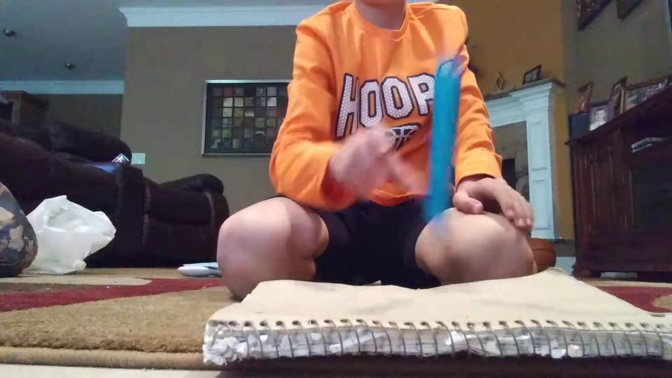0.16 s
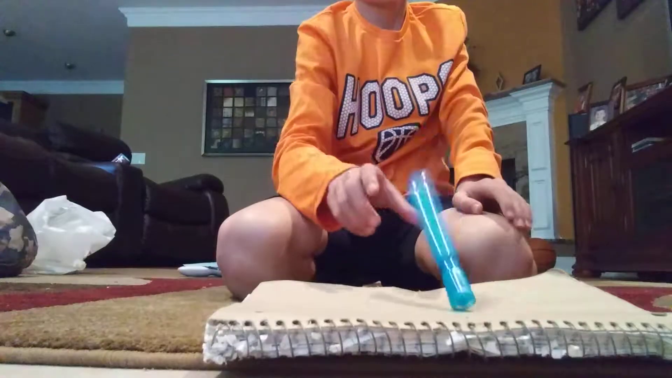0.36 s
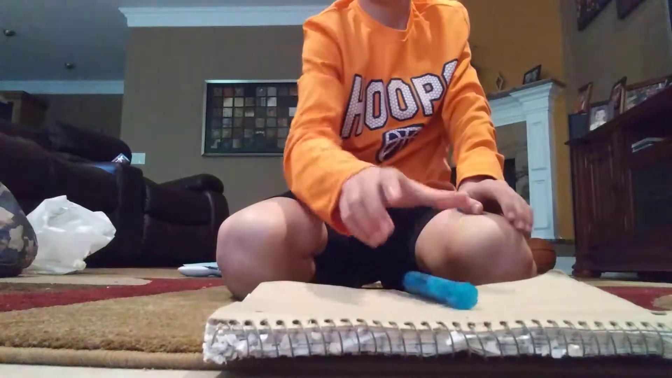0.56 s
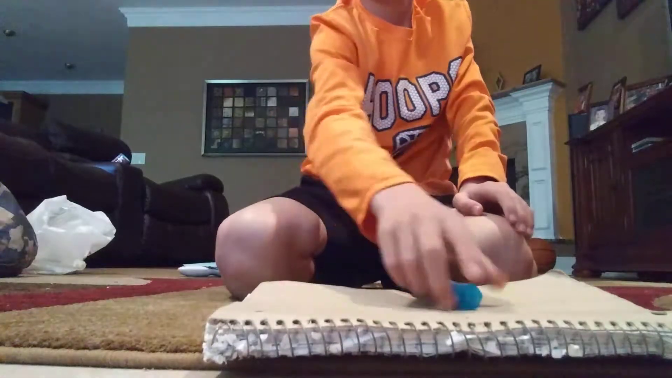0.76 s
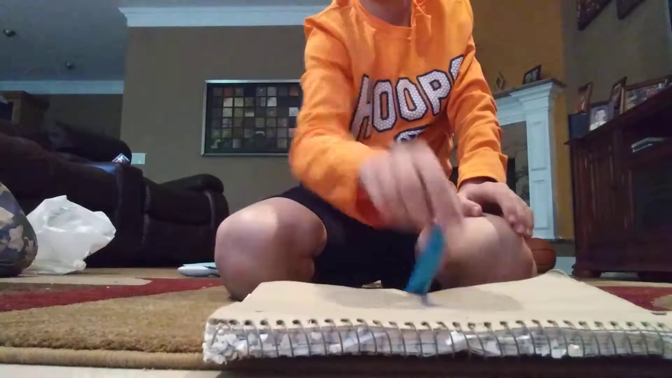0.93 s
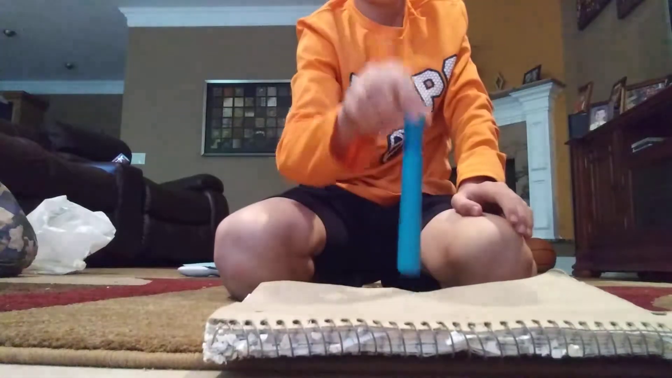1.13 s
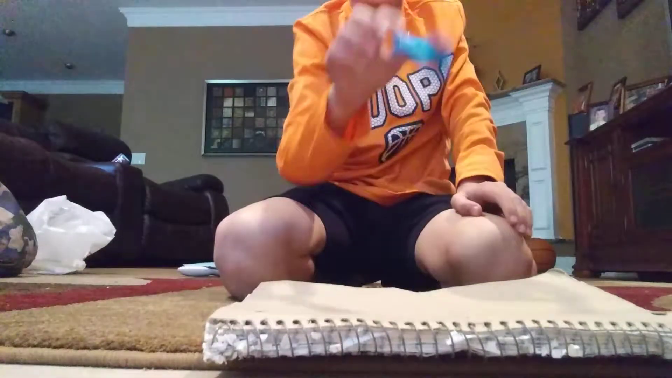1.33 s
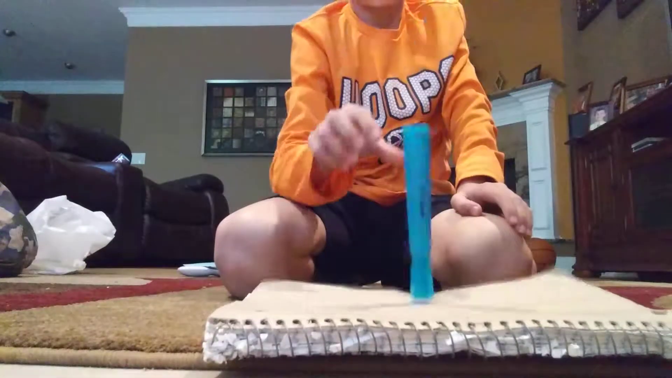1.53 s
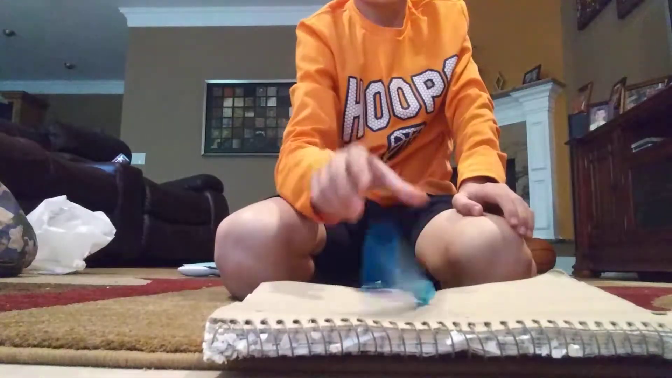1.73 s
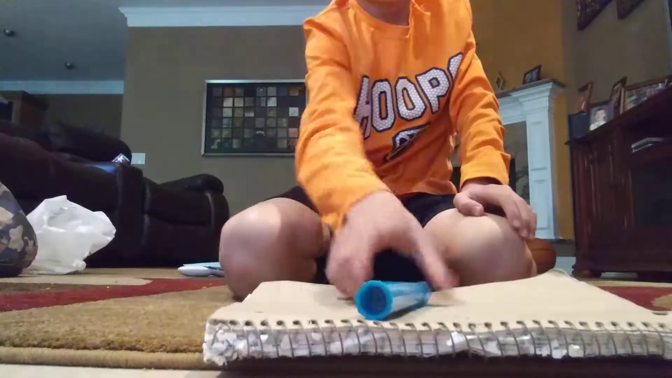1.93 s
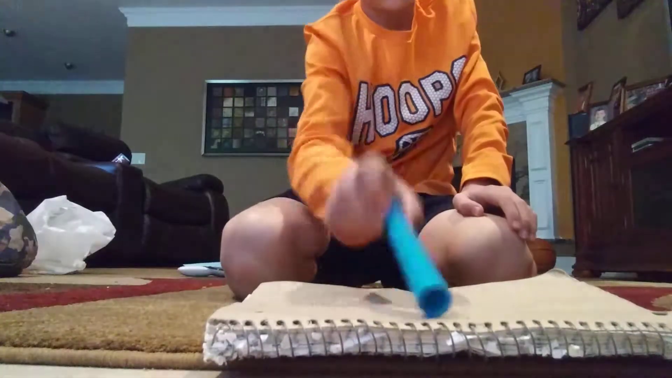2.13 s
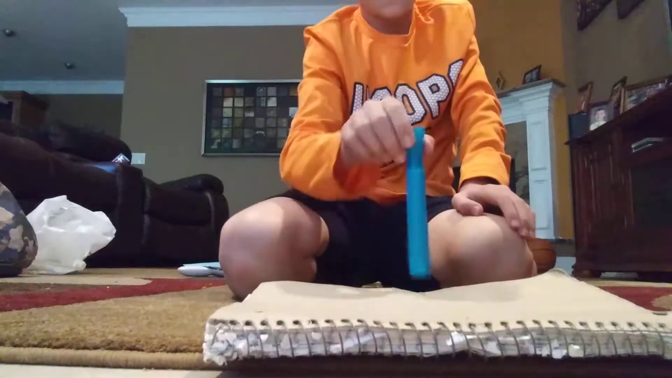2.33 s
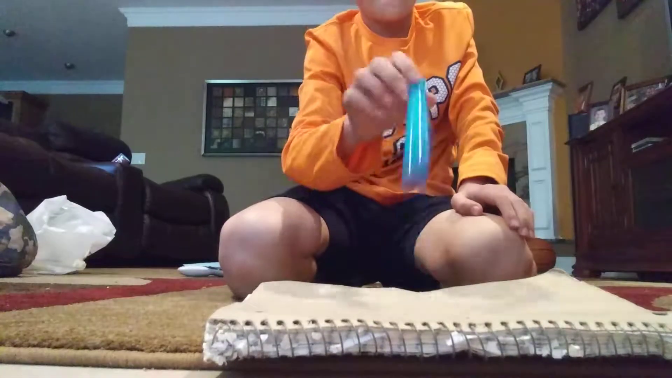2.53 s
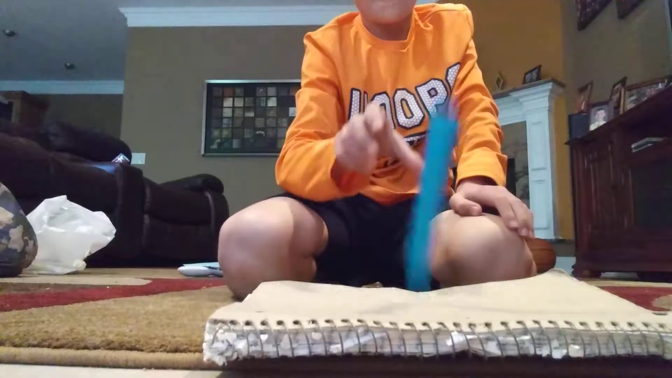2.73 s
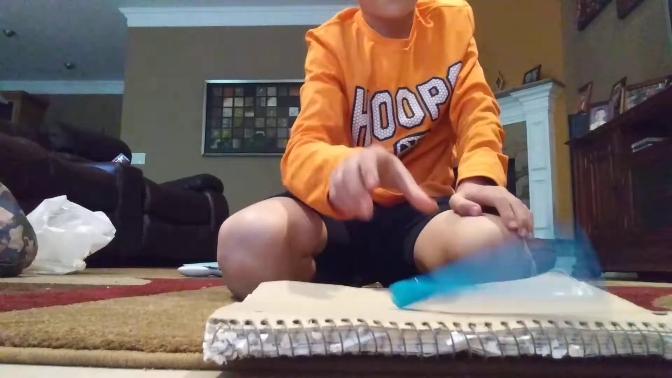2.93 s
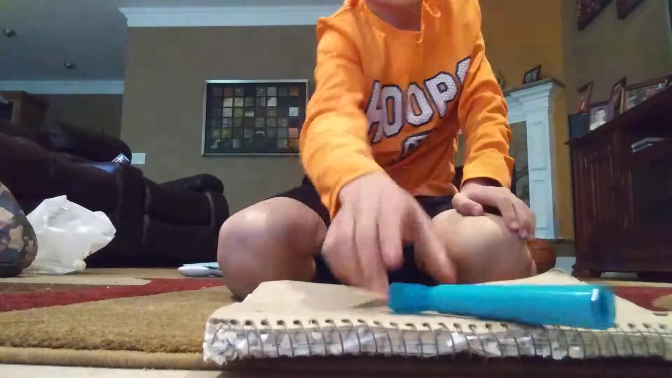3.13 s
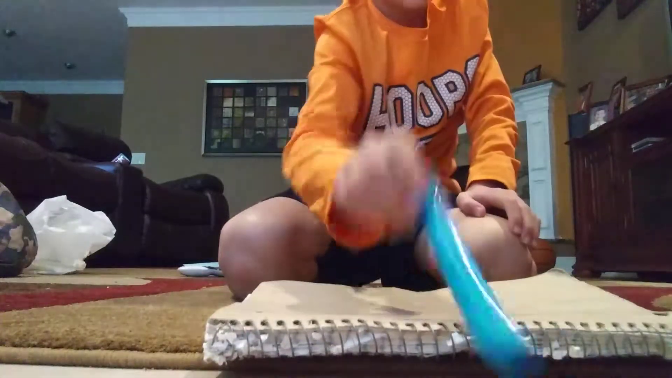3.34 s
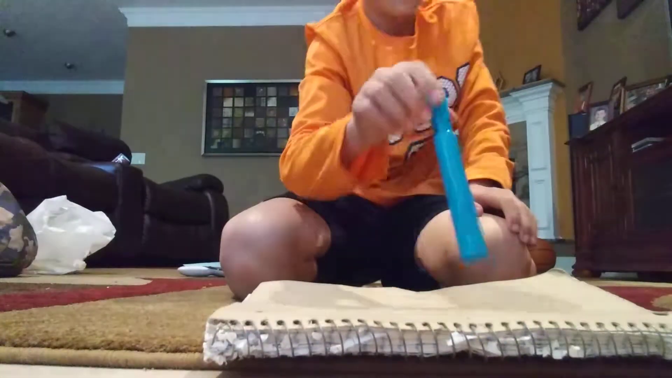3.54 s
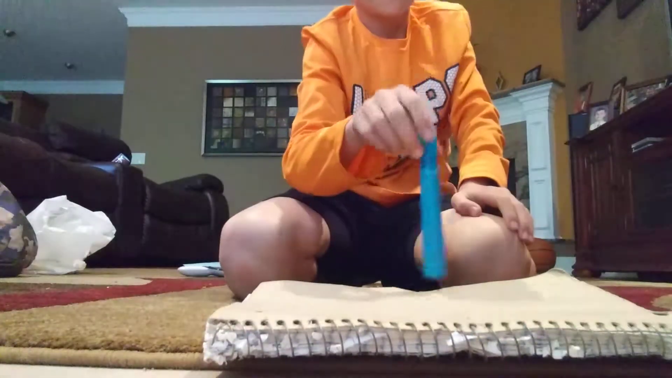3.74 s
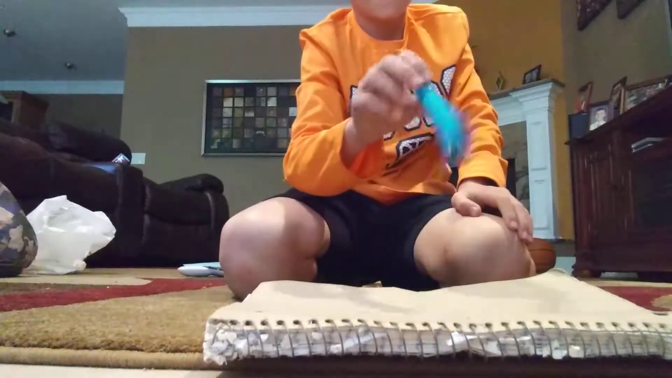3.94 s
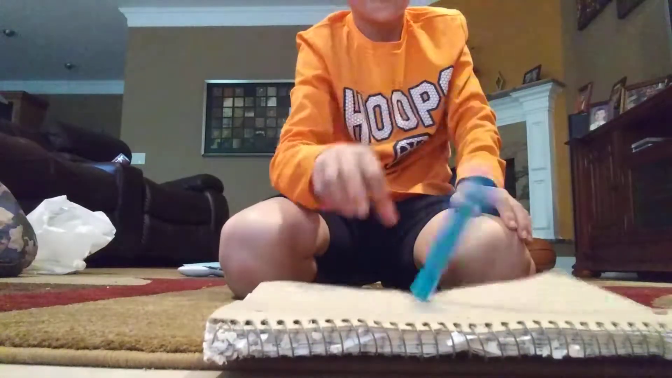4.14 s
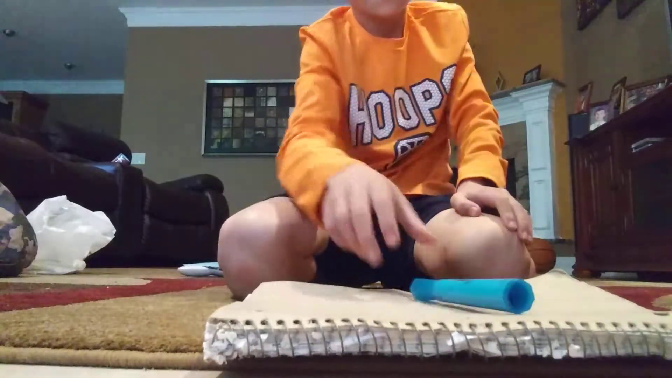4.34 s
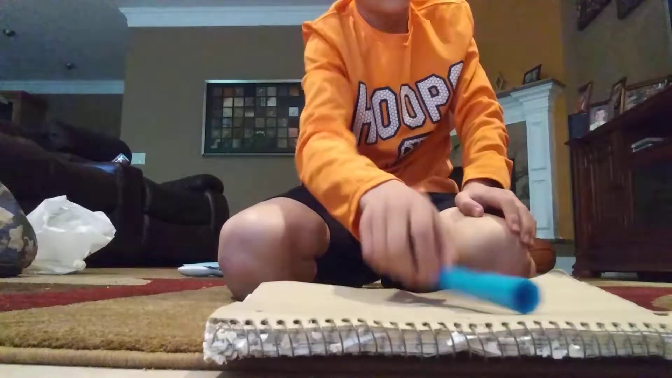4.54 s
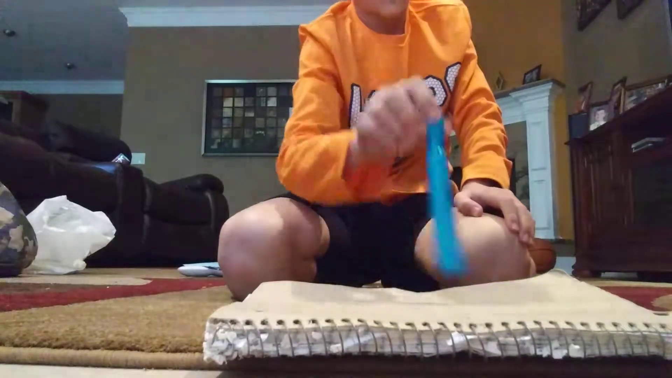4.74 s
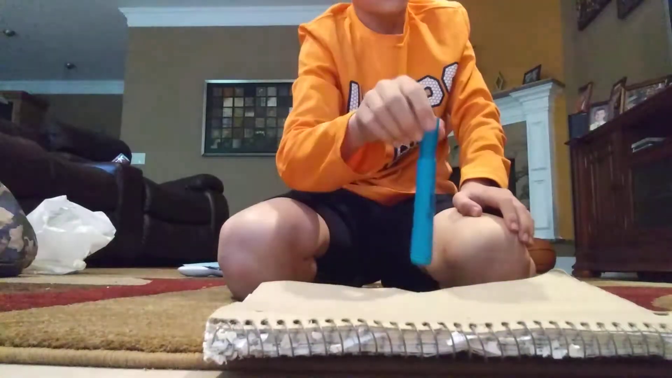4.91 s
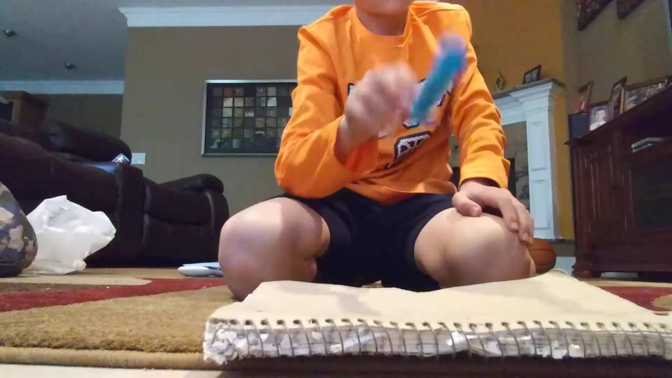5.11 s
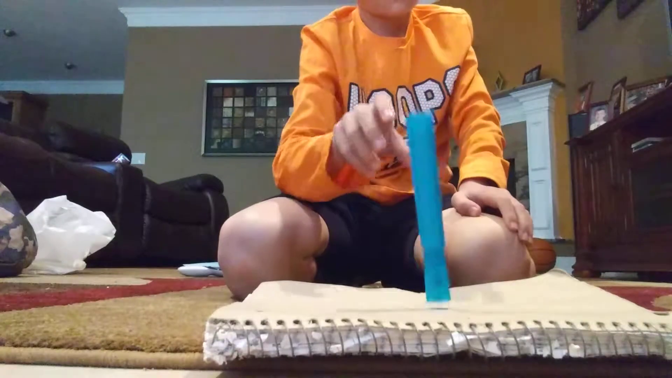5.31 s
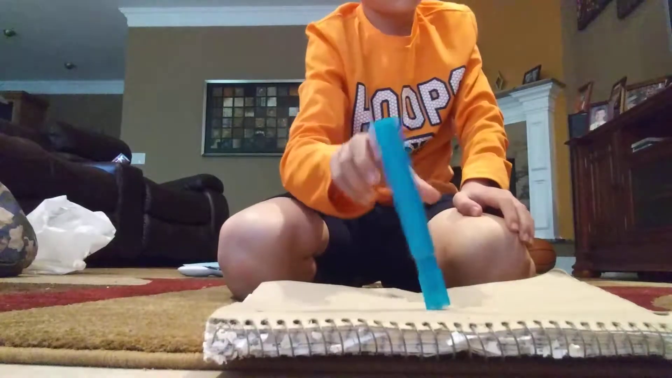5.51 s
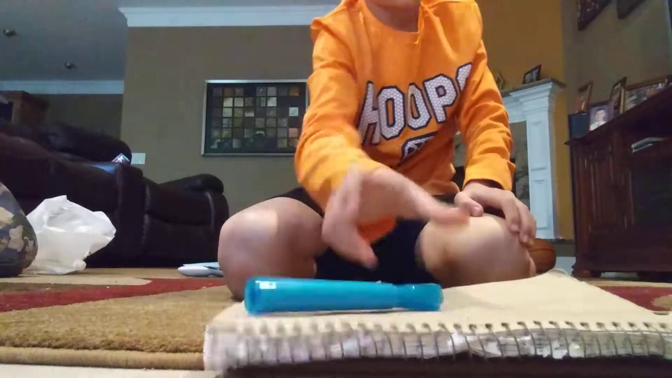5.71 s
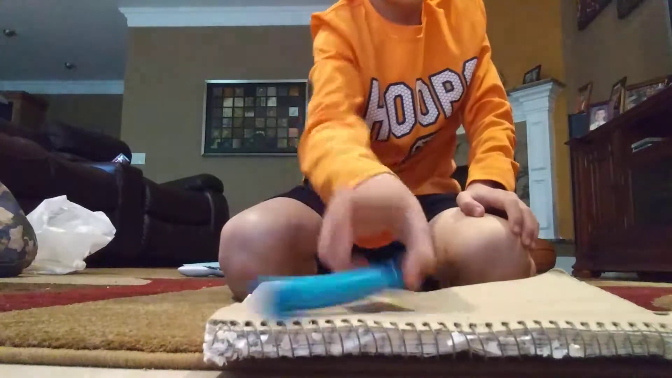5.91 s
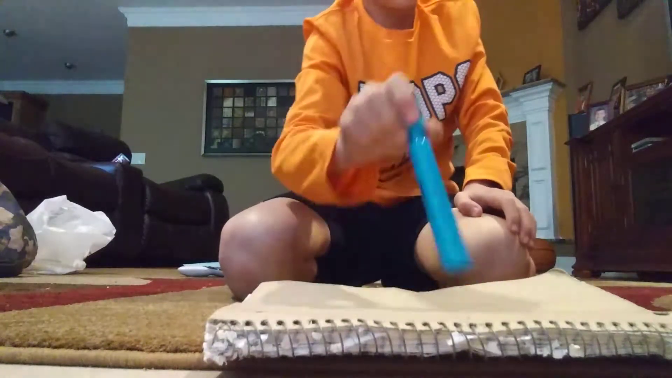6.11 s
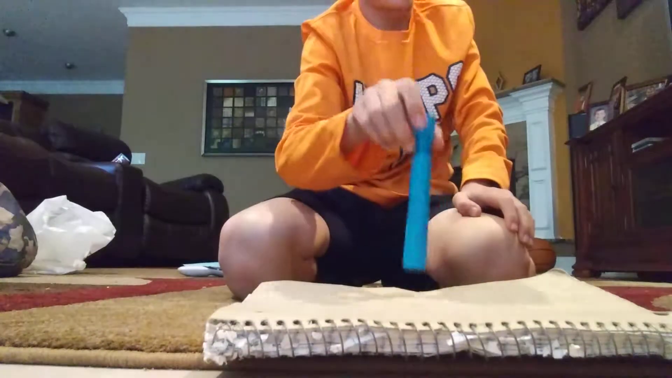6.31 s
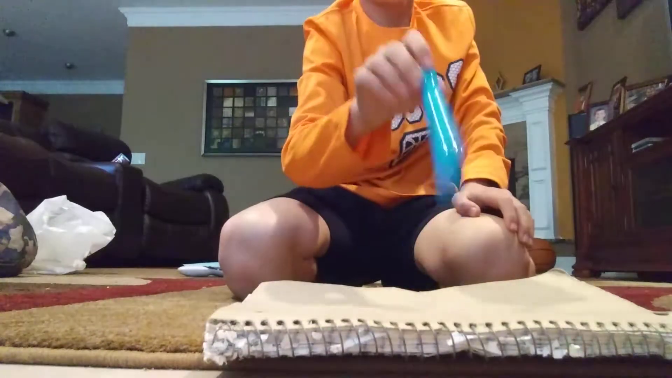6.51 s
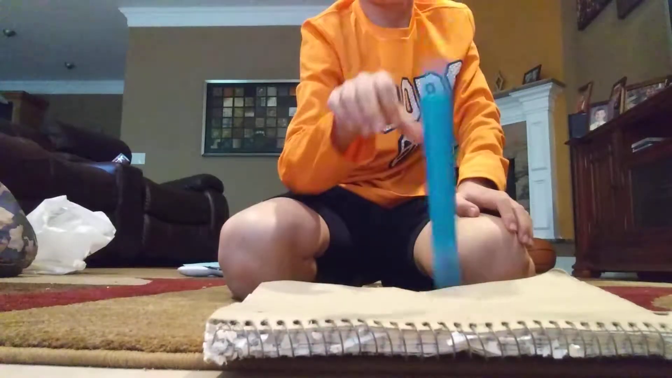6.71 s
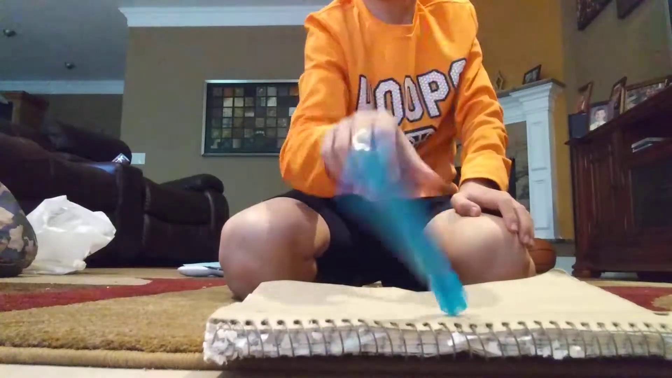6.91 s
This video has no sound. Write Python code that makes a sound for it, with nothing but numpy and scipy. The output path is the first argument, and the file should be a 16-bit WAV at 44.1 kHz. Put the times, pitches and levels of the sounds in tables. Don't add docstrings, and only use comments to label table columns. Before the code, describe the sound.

A hollow plastic marker repeatedly clacks end-first onto a paper pad, topples with a slap, bounces and gets scuffed up, ending in a close rattle.

```python
import sys
import numpy as np
from scipy import signal
from scipy.fft import rfft, irfft, next_fast_len
from scipy.io import wavfile
from scipy.ndimage import uniform_filter1d

SR = 44100
rng = np.random.default_rng(int(sys.argv[2]) if len(sys.argv) > 2 else 0)


def bounce(signal):
    frames = np.transpose(np.atleast_2d(signal))
    limited = np.clip(frames, -1, 1)
    pcm = np.round(limited * 32767).astype(np.int16)
    wavfile.write(sys.argv[1], SR, pcm)


def makeup_ratio(level_db):
    decades = np.asarray(level_db, float) / 20
    return 10 ** decades


N = 311346


def unit(x):
    return x / np.sqrt(np.mean(x ** 2) + 1e-20)


def peak_one(x):
    return x / np.abs(x).max()


def along(points, hz):
    f, v = np.transpose(points)
    return np.interp(np.log(hz + 1), np.log(f + 1), v)


def filtered(x, response):
    m = next_fast_len(x.shape[-1] + 8192)
    spectrum = rfft(x, m) * response(np.fft.rfftfreq(m, 1 / SR))
    return irfft(spectrum, m)[..., :x.shape[-1]]


def banded(x, low_hz, high_hz):
    sos = signal.butter(3, [low_hz, high_hz], "band", fs=SR, output="sos")
    return signal.sosfilt(sos, x)


def ringing(x, modes, detune=1):
    def response(f):
        total = 0
        for k, (centre, width, db) in enumerate(modes):
            centre = centre * detune
            damping = 1j * f * width
            total = total + (-1) ** k * makeup_ratio(db) * damping / (centre ** 2 - f ** 2 + damping)
        return total
    return filtered(x, response)


def add(track, s, x):
    track[round(s * SR):][:len(x)] += x


# f/Hz, level/dB
AIR = [(150, -79), (300, -72.5), (600, -73.5), (1200, -78), (3000, -92.5), (5000, -85.5), (8000, -100)]


def air():
    return filtered(rng.standard_normal(N), lambda f: makeup_ratio(along(AIR, f) + 23))


# f/Hz, level/dB per Hz
DRONE = [(20, -48), (50, -11), (75, -11.5), (105, 0.5), (135, -11), (200, -23.5), (400, -37.5), (1000, -65)]
# t/s, level/dB
RUMBLE = [(0.0, -72), (0.5, -66), (0.9, -68), (1.15, -77.5), (1.25, -88), (1.34, -63.5), (1.9, -62.5),
          (2.4, -70.5), (3.0, -68), (3.55, -71), (3.63, -74.5), (3.85, -67.5), (4.75, -73.5), (5.02, -65),
          (5.22, -71), (5.6, -68), (6.4, -67.5), (6.72, -73.5)]
# t/s, level/dB
LINE_PEEKS = [
    (1.49, -82),
    (2.25, -73.5),
    (2.52, -73.5),
    (3.87, -76.5),
    (4.5, -66.5),
    (4.661, -63),
    (4.87, -69),
    (6.17, -75),
    (6.35, -67.5),
    (6.5, -79.5),
]


def drone(pen):
    t = np.arange(N) / SR
    memory_s, open_from_db = 0.071, -60.5
    keep = np.exp(-1 / (memory_s * SR))
    recent = signal.lfilter([1 - keep], [1, -keep], pen ** 2)
    open_db = np.maximum(10 * np.log10(recent + 1e-12) - open_from_db, 0)

    rumble = unit(filtered(rng.standard_normal(N), lambda f: makeup_ratio(along(DRONE, f))))
    rumble_db = np.interp(t, *np.transpose(RUMBLE)) + 3.5 + 0.38 * open_db

    line_mode = [(319.5, 17, 0)]
    line = unit(ringing(ringing(rng.standard_normal(N), line_mode), line_mode))
    peek_s = 0.03
    peeks = sum(makeup_ratio(db) * np.exp(-((t - s) / peek_s) ** 2) for s, db in LINE_PEEKS)
    line_gain = makeup_ratio(-90 + 0.8 * open_db) + peeks
    return makeup_ratio(rumble_db) * rumble + line_gain * line


# f/Hz, t60/s
ROOM = [(60, 1), (200, 0.28), (500, .5), (1500, 0.8), (4000, 1), (8000, 0.6), (14000, 0.9)]
# f/Hz, level/dB
ROOM_DB = [(60, -8), (250, -3), (700, -11.5), (2000, -8.5), (3300, -16), (5500, -12), (10000, -3.5),
           (15000, -16)]
# t/s, level/dB
ECHOES = [(0.0177, -16.5), (0.0343, -23)]


def room(x, uneven_db, wet_db):
    hz, t, z = signal.stft(rng.standard_normal(SR // 2), SR, nperseg=256)
    colour = makeup_ratio(along(ROOM_DB, hz) + wet_db + uneven_db * rng.standard_normal(len(hz)))
    decay = makeup_ratio(-60 * t / along(ROOM, hz)[:, None])
    tail = signal.istft(z * decay, SR, nperseg=256)[1]
    tail = filtered(tail / np.linalg.norm(tail), lambda f: np.interp(f, hz, colour))
    age = np.arange(len(tail)) / SR
    tail *= 1 - np.exp(-age / 0.005)
    tail += makeup_ratio(-30.5 - 60 * age / 0.058) * (age > 0.001) * rng.standard_normal(len(tail))
    for s, db in ECHOES:
        tail[round(s * SR):][:8] += makeup_ratio(db - 17) * rng.standard_normal(8)
        tail[round(s * SR)] += makeup_ratio(db - 3.5)
    for delay, size in rng.random((3, 2)):
        tail[round((0.0004 + 0.002 * delay) * SR)] += makeup_ratio(-13) * (4 * size - 2)
    tail[0] += 1
    return signal.fftconvolve(x, tail)


def rub(length, layers):
    u = np.arange(SR // 8) / SR / np.clip(length, 0.002, 0.12)
    stroke = np.clip(6 * u, 0, 1) * np.clip(1 - u, 0, 1) ** 0.66
    snags = makeup_ratio(0.62 * rng.exponential(size=len(u)))
    total = 0
    for modes, low, high, db in layers:
        grit = rng.standard_normal(len(u)) * snags
        total = total + makeup_ratio(db) * unit(banded(ringing(grit, modes), low, high))
    return stroke * total


# t/s, level/dB, length/s, f/Hz, width/Hz
SQUEAKS = [(3.501, -55, 0.018, 1380, 138.9), (4.102, -65.5, .015, 5680, 80),
           (4.119, -62.5, 0.059, 1893, 90.6), (4.121, -66, .055, 2450, 90), (4.126, -71, 0.065, 5700, 54),
           (4.134, -70.5, .04, 3920, 70), (4.13, -71, .05, 4430, 90), (5.637, -53, 0.057, 1350, 260),
           (5.645, -54, .075, 2150, 260), (5.642, -65.5, 0.024, 6050, 80), (5.668, -71, .04, 5840, 80)]


def squeaks():
    out = np.zeros(N + SR)
    for s, db, length, note_hz, width in SQUEAKS:
        x = rub(length, [([(note_hz, width, 0)], note_hz - width, note_hz + width, db)])
        add(out, s, room(x, uneven_db=0.5, wet_db=-1.5))
    return out[:N]


# t/s, high level/dB, low level/dB, middle level/dB, length/s
DRAGS = [(0.435, -53.5, -55, -55, 0.04), (0.783, -64.5, -58, -63, 0.0094), (0.808, -58, -53, -57.5, 0.038),
         (0.852, -71.5, -58, -62, 0.068), (1.082, -61, -80.5, -79, 0.013), (2.036, -61, -50.5, -64, 0.03),
         (2.093, -55.5, -81, -79, 0.078), (3.236, -50, -45.5, -53, 0.056), (3.283, -49, -66, -56, 0.0096),
         (4.121, -71.5, -55, -63.5, 0.044), (4.586, -53.5, -51, -60, 0.044),
         (4.819, -88, -57.5, -64.5, 0.1), (5.638, -81.5, -58, -69, 0.065)]
# f/Hz, width/Hz, level/dB
CREAK_HIGH = [(4240, 300, 1), (5050, 360, 0.5), (5640, 300, -6)]
CREAK_LOW = [(415, 40, 0), (654, 37, 1.5), (900, 110, -1.5)]
CREAK_MIDDLE = [(1940, 600, -11), (2270, 270, -16)]


def drags():
    out = np.zeros(N + SR)
    middle = [(1420, 150, 0)] + list(CREAK_MIDDLE)
    for s, high_db, low_db, middle_db, length in DRAGS:
        x = rub(length, [(CREAK_HIGH, 3600, 6200, high_db),
                         (CREAK_LOW, 300, 1100, low_db),
                         (middle, 1100, 2600, middle_db)])
        add(out, s, room(x, uneven_db=4.5, wet_db=0.5))
    return out[:N]


# t/s, high level/dB, cover level/dB, length/s, high centre f/Hz
SCUFFS = [(2.119, -46.5, -81, 0.014, 4820), (2.15, -48, -56, 0.015, 4500),
          (2.179, -42, -42.5, 0.0055, 4370), (2.19, -43.5, -44, 0.011, 4400),
          (2.2214, -48, -43, 0.0087, 4600), (2.233, -37, -49, 0.0041, 4300),
          (2.24, -38, -40.5, 0.014, 4440), (2.269, -36, -46.5, 0.011, 4470),
          (3.329, -46.5, -70, 0.0043, 4850), (3.344, -47.5, -61, .008, 4970),
          (3.391, -32, -53, 0.0033, 4840), (3.363, -52, -76, 0.0047, 4930),
          (5.9696, -38.5, -55.5, 0.011, 5700), (5.979, -48.5, -75, .007, 5640),
          (6.009, -30.5, -47.5, 0.0089, 5800), (6.019, -36, -41.5, 0.004, 5700),
          (6.0207, -36, -48, 0.015, 4960), (6.041, -52, -65, 0.0028, 5130)]


def scuffs():
    out = np.zeros(N + SR)
    for s, high_db, cover_db, length, centre_hz in SCUFFS:
        high = [(centre_hz, 1600, 0)]
        x = rub(length, [(high, 0.67 * centre_hz, 1.15 * centre_hz, high_db),
                         (KNOCK, 450, 1500, cover_db - 1),
                         (SLAP, 1000, 3200, cover_db)])
        add(out, s, room(x, uneven_db=1.5, wet_db=-1))
    return out[:N]


# t/s, click level/dB, pad thud level/dB, barrel knock level/dB, hard edge level/dB
LANDINGS = [
    (0.2771, -17.5, -25.5, -26.5, -79),
    (1.5752, -11, -26, -24, -55),
    (2.8104, -17, -22, -21.5, -50.5),
    (4.1836, -13.5, -33, -16, -40.5),
    (5.2889, -25.5, -21.5, -25, -80),
    (6.769, -12, -25, -18.5, -42),
]
# t/s, click level/dB, barrel knock level/dB, cover slap level/dB, hard edge level/dB
FALLS = [
    (0.4966, -25, -41.5, -32, -92),
    (1.8044, -8, -25, -17.5, -40.5),
    (3.0059, -8, -20, -22, -29.5),
    (4.2564, -11, -15.5, -18.5, -40.5),
    (5.727, -9, -27.5, -21, -38.5),
]
# t/s, click level/dB, barrel knock level/dB, cover slap level/dB
BOUNCES = [(0.3476, -34.5, -31.5, -35.5), (0.7883, -53, -47, -63), (0.8556, -49, -45.5, -54),
           (1.646, -33, -38, -32), (1.837, -35.5, -37, -66.5), (1.9578, -56, -36, -44.5),
           (2.8916, -38, -31.5, -42.5), (4.3235, -24, -27.5, -30), (4.4987, -36.5, -34.5, -38.5),
           (5.3658, -33, -38, -37), (5.401, -49.5, -46.5, -51.5), (6.823, -34, -40, -40.5),
           (7.0023, -35, -39.5, -46)]
# t/s, click level/dB, cover slap level/dB, hard edge level/dB
TICKS = [
    (3.3896, -26.5, -57, -76),
    (5.9692, -30, -65, -51),
    (6.0108, -24, -58, -40),
    (6.0254, -24, -41, -39),
]
# t/s, click level/dB, cover slap level/dB, hard edge level/dB
CHATTER = [
    (7.0047, -7, -31.5, -43.5),
    (7.0175, -19.5, -50, -48),
    (7.0189, -2.5, -20, -19),
    (7.0197, -3, -25, -36.5),
    (7.0207, -11.5, -20.5, -47),
    (7.0229, -16, -34, -31),
]
# t/s, pad thud level/dB, barrel knock level/dB, cover slap level/dB
PATS = [
    (3.2319, -45, -58, -40),
    (4.8265, -83, -44.5, -73.5),
    (4.998, -45.5, -88, -99),
    (5.111, -60, -58, -59),
    (5.299, -27.5, -50.5, -46),
]


def blows():
    silent_db = -120
    every = [(s, click, thud, knock, -14.5 + 0.55 * click, edge) for s, click, thud, knock, edge in LANDINGS]
    every += [(s, click, -35.5, knock, slap, edge) for s, click, knock, slap, edge in FALLS]
    every += [(s, click, knock - 15.5, knock, slap, click - 44.5) for s, click, knock, slap in BOUNCES]
    for ticks in (TICKS, CHATTER):
        every += [(s, click, click - 47, click - 50, slap, edge) for s, click, slap, edge in ticks]
    every += [(s, silent_db, thud, knock, slap, silent_db) for s, thud, knock, slap in PATS]
    return every


# f/Hz, width/Hz, level/dB
CLICK = [(2990, 730, -8.5), (4300, 1100, 1), (5120, 1200, 5), (6510, 1900, -5)]
EDGE = [(7660, 1200, 1), (9640, 2000, -12), (13000, 2500, -15), (15300, 1200, -12)]
SLAP = [(1460, 640, -9.5), (2100, 190, -2.5), (2810, 1800, -6.5)]
KNOCK = [(330.8, 270, -4.5), (570, 430, 3), (1162, 480, -1.5)]
THUD = [(64, 44, -6.5), (119, 79, 0), (218, 120, -1.5)]


def strike(click_db, thud_db, knock_db, slap_db, edge_db):
    t = np.arange(SR // 10) / SR
    force = makeup_ratio(-60 * t / 0.0006) * (1 + 0.15 * rng.standard_normal(len(t)))
    barrel_s, pad_s = 0.00012, 0.0003
    barrel_push = t / barrel_s * np.exp(-t / barrel_s)
    pad_push = t / pad_s * np.exp(-t / pad_s)
    detune = 1 + 0.04 * rng.standard_normal(4)
    click = makeup_ratio(click_db + 1.5) * peak_one(banded(ringing(force, CLICK, detune[0]), 1800, 6900))
    edge = makeup_ratio(edge_db + 6.5) * peak_one(banded(ringing(force, EDGE), 6200, 16000))
    slap = makeup_ratio(slap_db + 7) * peak_one(banded(ringing(force, SLAP, detune[1]), 510, 3300))
    knock = makeup_ratio(knock_db + 4.5) * peak_one(ringing(barrel_push, KNOCK, detune[2]))
    thud = makeup_ratio(thud_db + 6) * peak_one(ringing(pad_push, THUD, detune[3]))
    return click + edge + knock + slap + thud


def contacts():
    out = np.zeros(N + SR)
    for s, *levels_db in blows():
        near = s >= CHATTER[0][0]
        wet_db = 2 - 5.5 * near
        add(out, s + 0.0012, room(strike(*levels_db), uneven_db=0.5, wet_db=wet_db))
    return out[:N]


# f/Hz, level/dB
GATE = [(60, -65), (200, -66.5), (500, -67), (1400, -72), (3000, -85.5), (5000, -77), (7000, -85.5),
        (10000, -83), (15000, -72.5)]
# f/Hz, width/Hz, threshold lowered by level/dB
LINGERS = [(1515, 91, 7), (5150, 300, 5)]


def suppress(x, steepness=5, leak_db=-27):
    hz, _, z = signal.stft(x, SR, nperseg=768, noverlap=576)
    power = uniform_filter1d(np.abs(z) ** 2, size=5, axis=0)
    memory = 0.6
    recent = np.abs(signal.lfilter([1 - memory], [1, -memory], power, axis=1))
    eased_db = sum(db * np.exp(-((hz - c) / w) ** 2) for c, w, db in LINGERS)
    threshold = makeup_ratio(2 * (along(GATE, hz) - eased_db) - 27.5)
    over = recent / threshold[:, None]
    whole = np.mean(over[hz < 7000], axis=0) * makeup_ratio(1)
    openness = over / (1 + over) * whole / (1 + whole)
    gain = np.maximum(openness ** steepness, makeup_ratio(leak_db))
    return signal.istft(z * gain, SR, nperseg=768, noverlap=576)[1][:N]


def scene():
    pen = contacts() + scuffs() + drags() + squeaks()
    return (suppress(pen + air()) + drone(pen))[None]


def roll_off(x):
    return signal.sosfilt(signal.butter(12, 16530, fs=SR, output="sos"), x)


def record(dry):
    cut = filtered(dry, lambda f: (1j * f / (35 + 1j * f)) ** 2)
    hiss = makeup_ratio(-80.5) * filtered(rng.standard_normal(dry.shape), lambda f: f < 15700)
    return roll_off(cut + hiss)


dry = scene()
out = record(dry)
bounce(out)
```